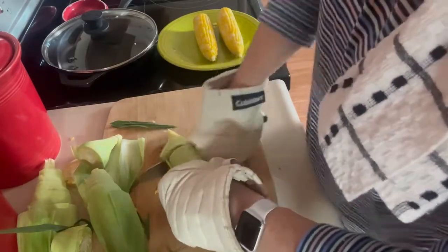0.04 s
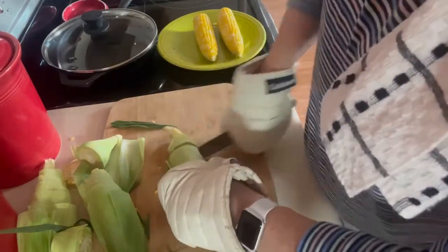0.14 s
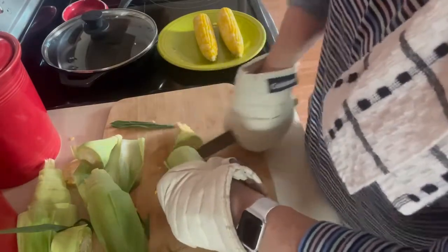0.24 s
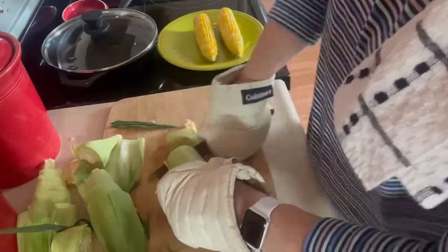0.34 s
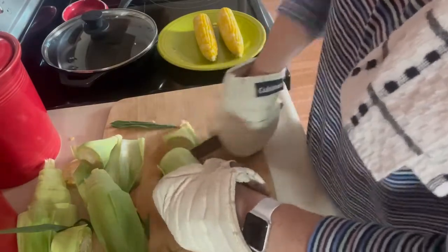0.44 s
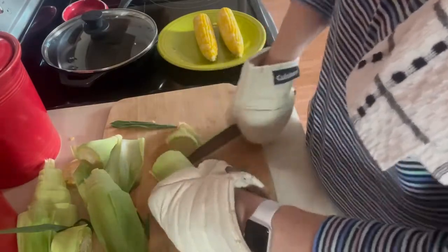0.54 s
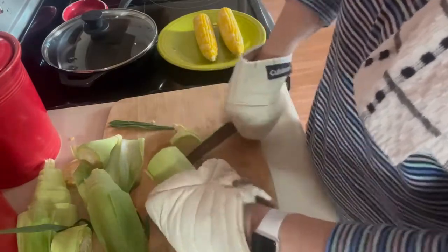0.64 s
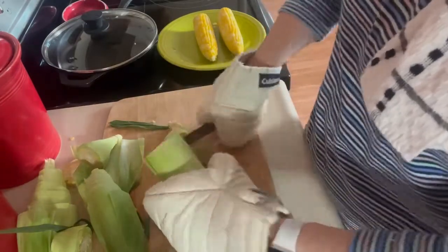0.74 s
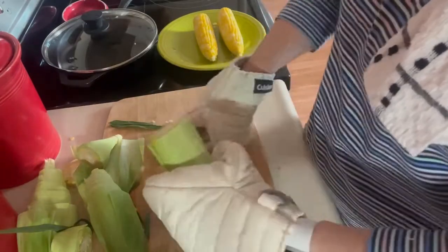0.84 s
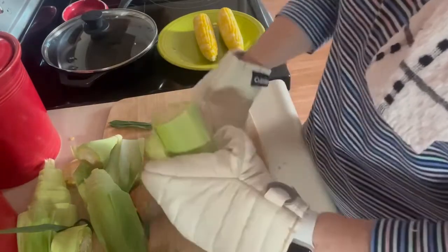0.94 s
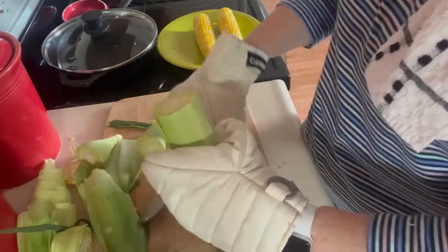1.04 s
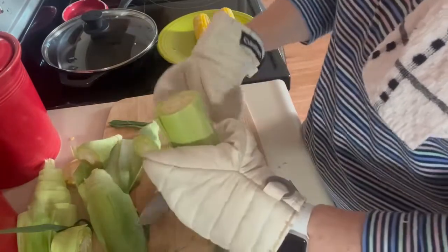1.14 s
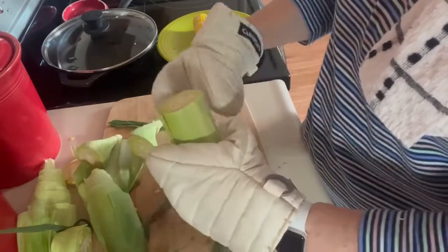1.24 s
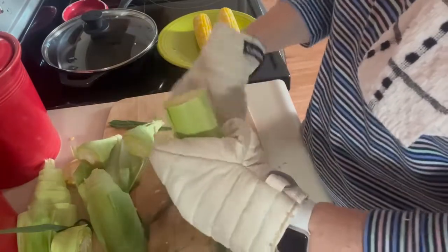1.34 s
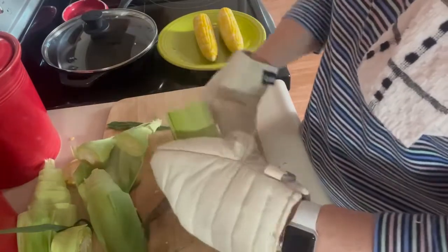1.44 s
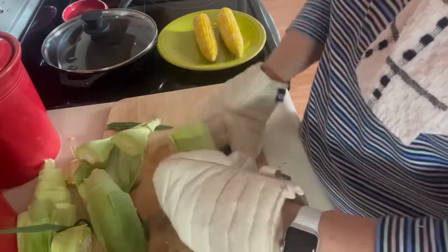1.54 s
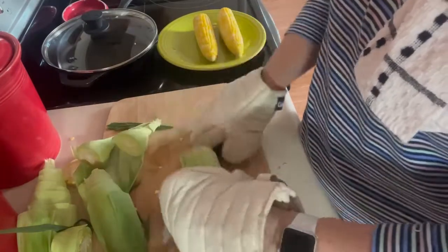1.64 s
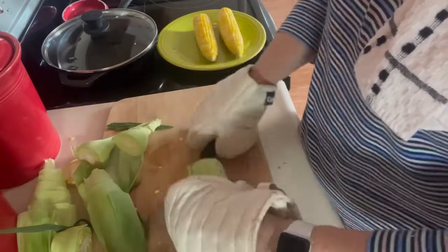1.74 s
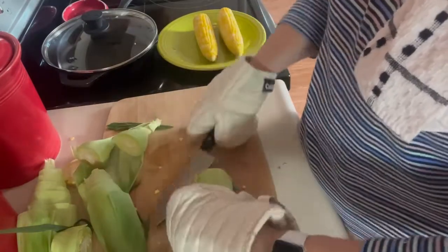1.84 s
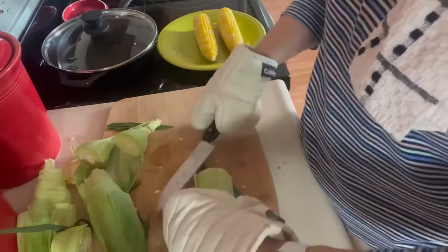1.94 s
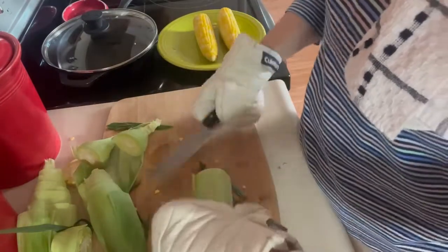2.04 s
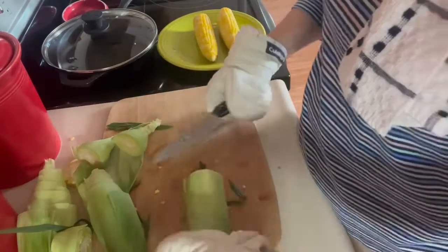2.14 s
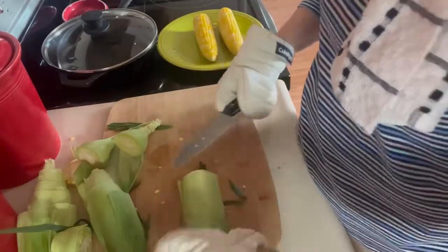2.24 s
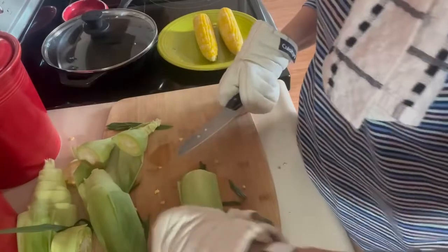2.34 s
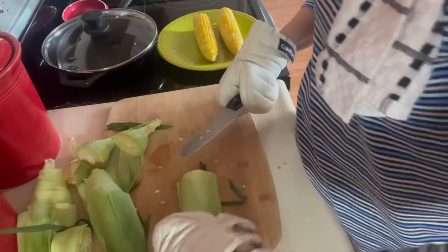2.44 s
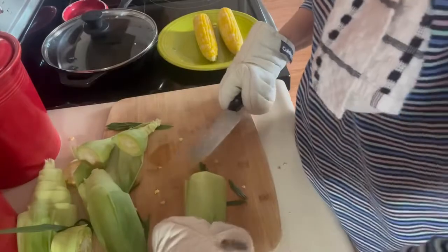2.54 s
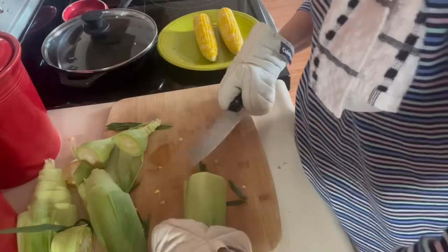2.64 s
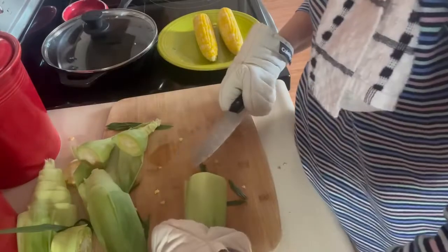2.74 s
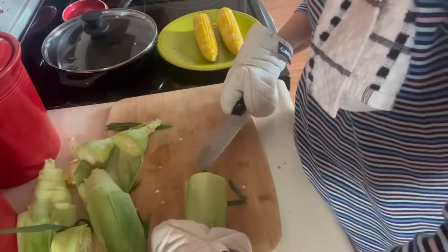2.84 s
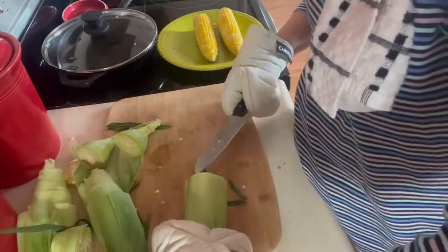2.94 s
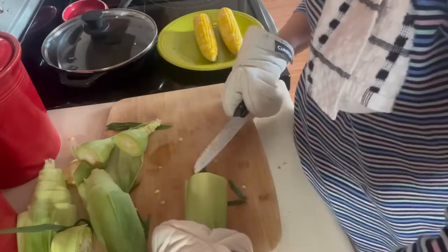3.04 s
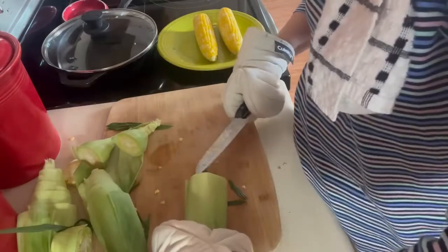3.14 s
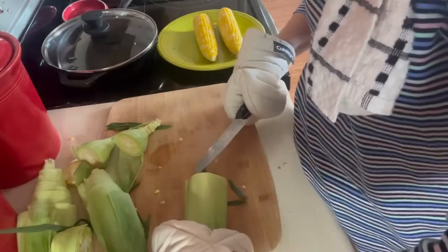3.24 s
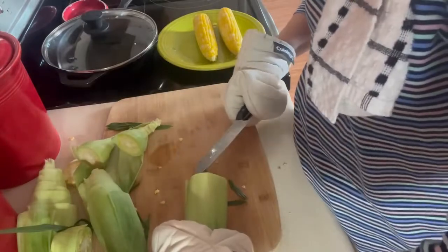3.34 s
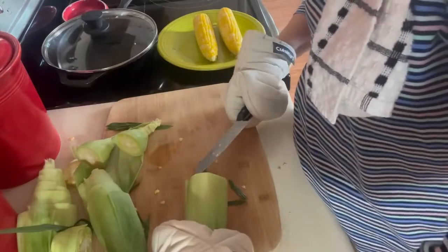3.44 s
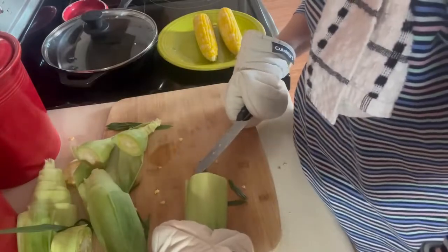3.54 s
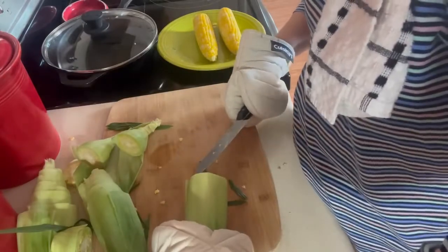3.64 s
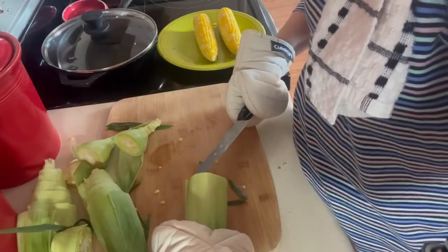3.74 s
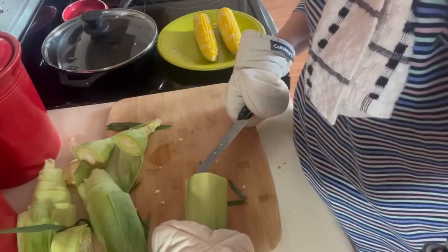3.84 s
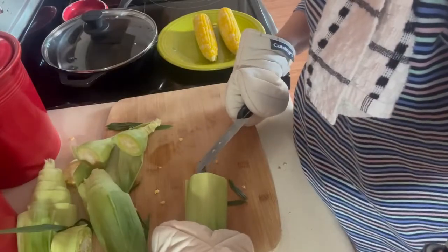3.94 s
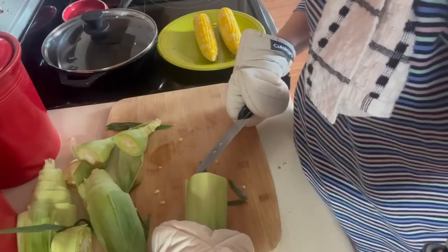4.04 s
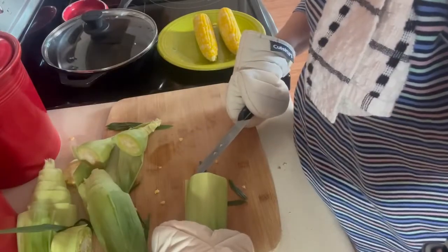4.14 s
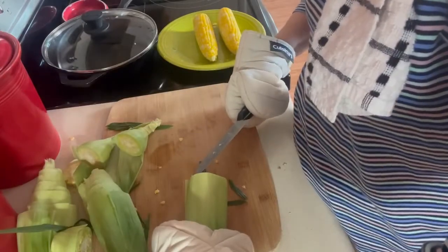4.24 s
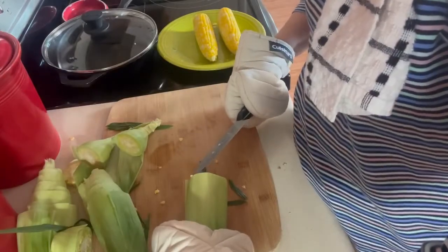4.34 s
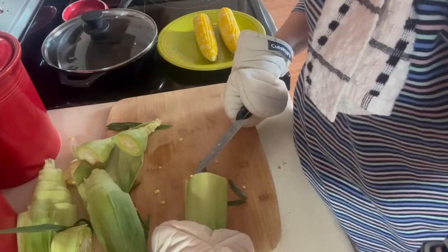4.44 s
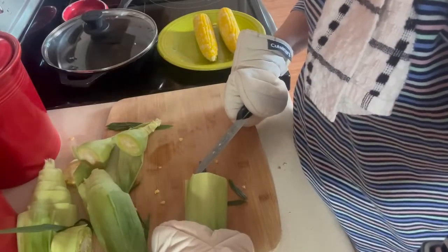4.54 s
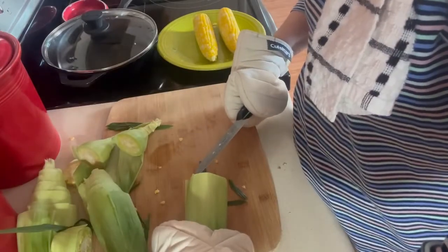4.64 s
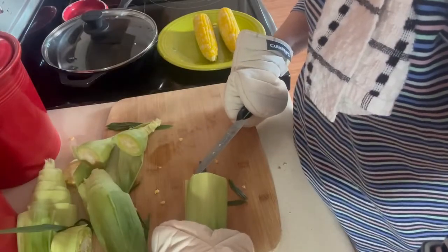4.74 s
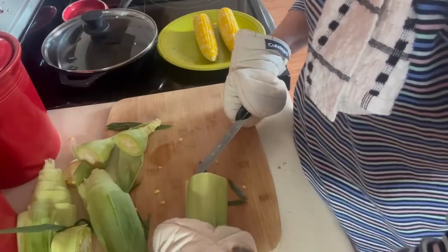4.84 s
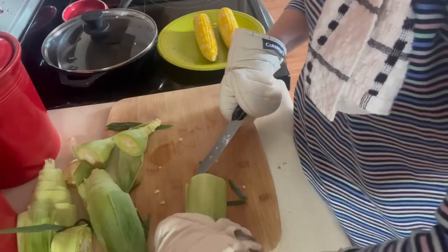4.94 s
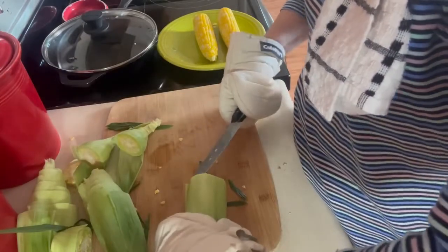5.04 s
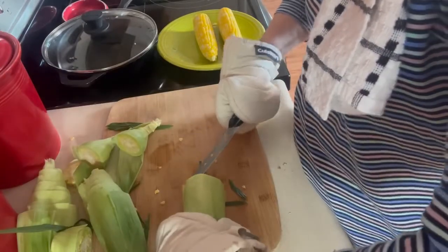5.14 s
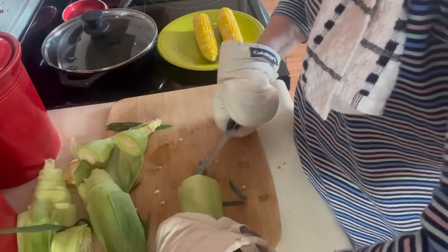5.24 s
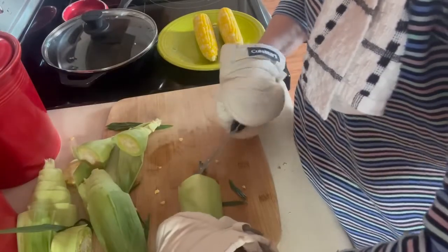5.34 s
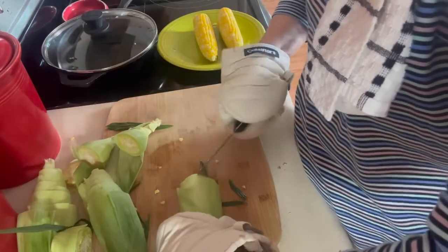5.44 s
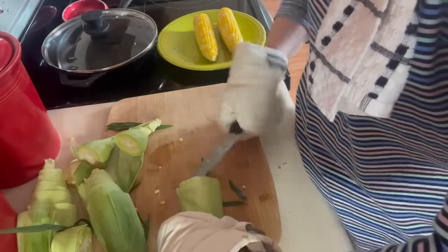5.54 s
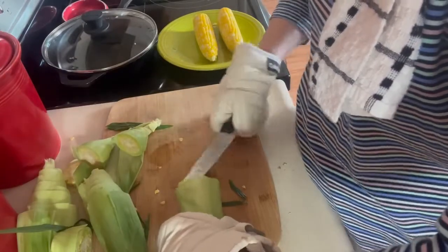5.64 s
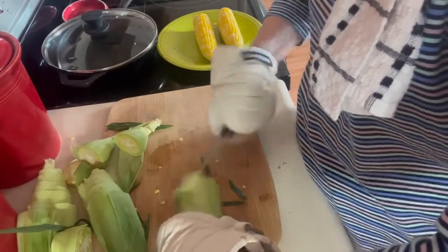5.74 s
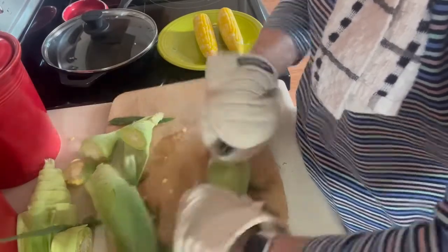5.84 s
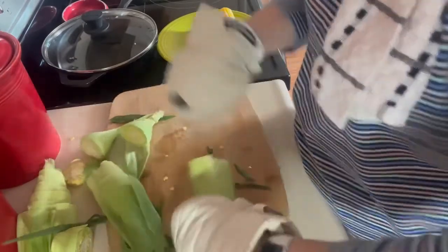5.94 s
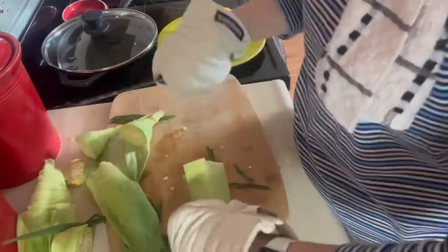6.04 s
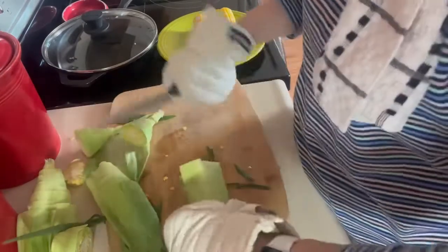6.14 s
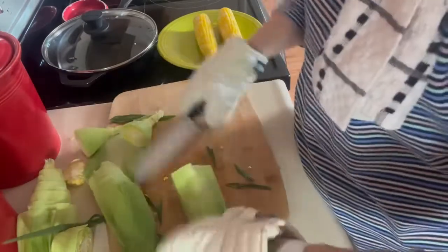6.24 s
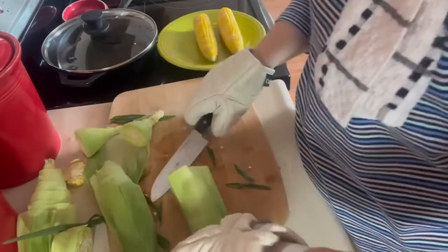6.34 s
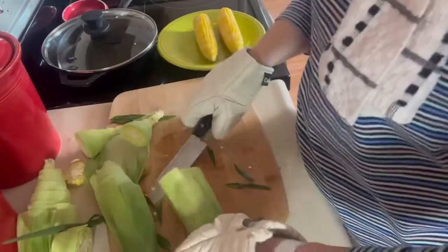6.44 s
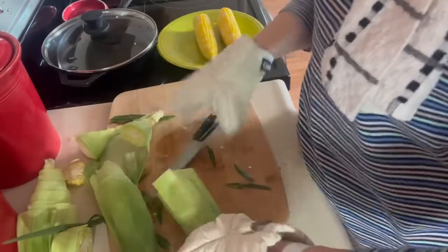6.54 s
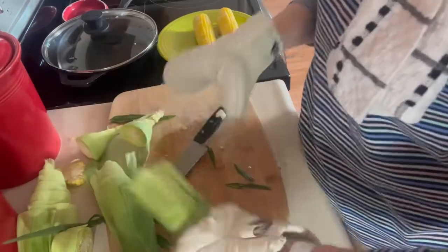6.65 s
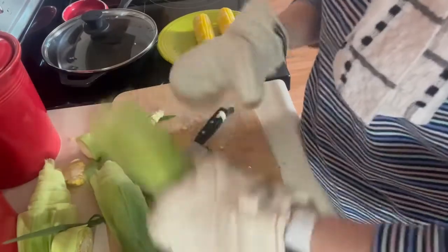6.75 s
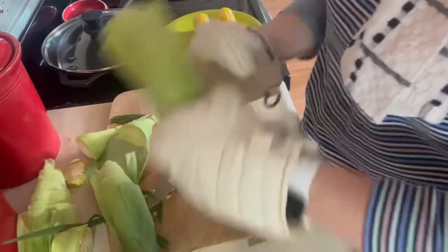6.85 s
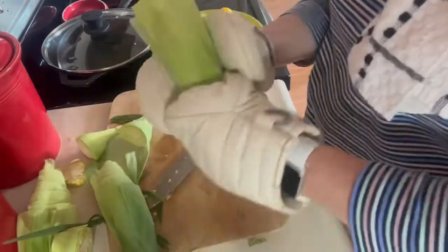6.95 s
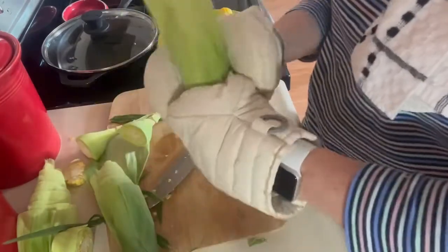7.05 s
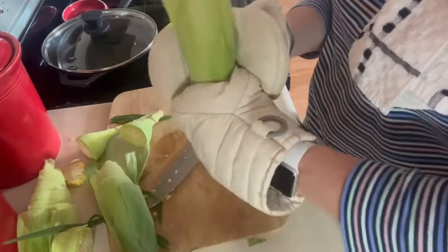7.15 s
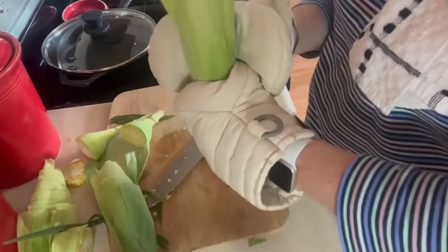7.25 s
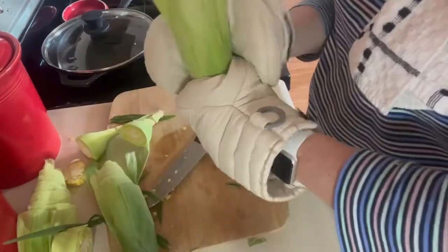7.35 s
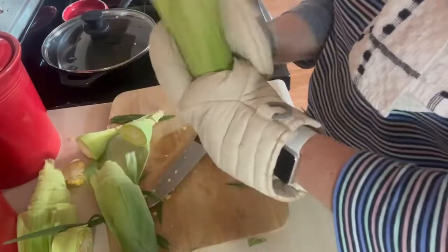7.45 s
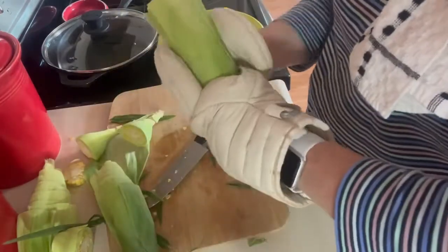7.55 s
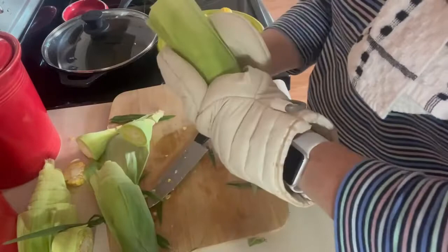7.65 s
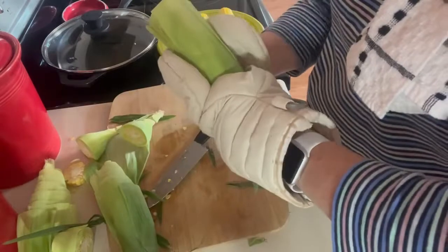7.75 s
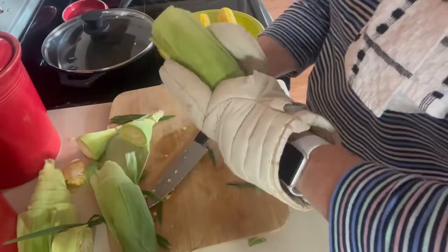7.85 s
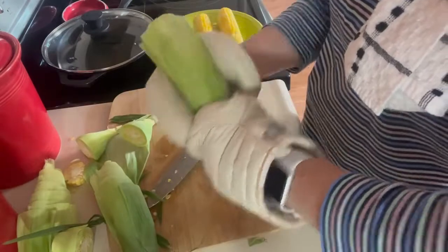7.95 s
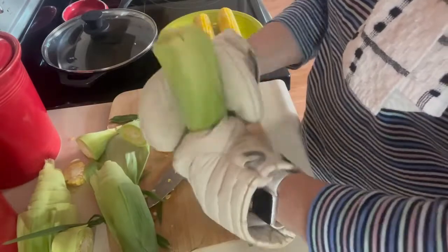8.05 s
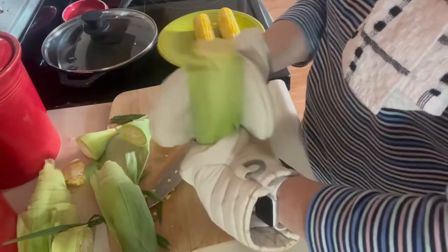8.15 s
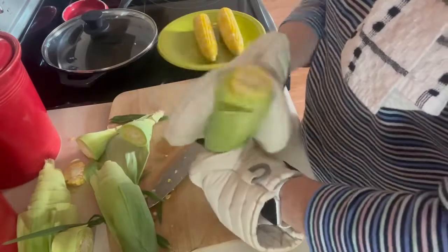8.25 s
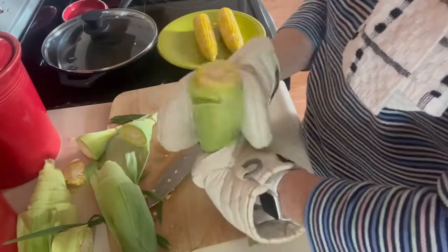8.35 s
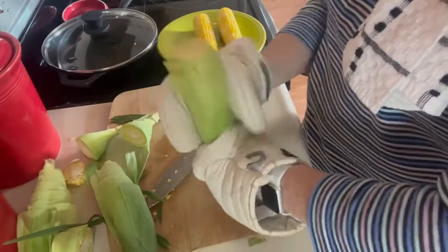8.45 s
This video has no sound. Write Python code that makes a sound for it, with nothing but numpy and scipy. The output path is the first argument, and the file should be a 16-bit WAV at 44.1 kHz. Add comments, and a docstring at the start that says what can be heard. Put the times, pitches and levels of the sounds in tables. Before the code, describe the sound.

Stereo close pickup, lightly echoing domestic room. Quiet sawing strokes come first, then a dense double knock of knife and cob on wood and a few smaller bumps. Near silence holds in the middle, with only hum and faint handling. Small ticks and drags return, then two sharp woody clacks with metallic clinks, a tumbling rattle, and soft dry rustling to the end.

```python
"""Knocks on a wooden board lead, as a gloved cook saws the end off a cooked corn cob in a small kitchen.
Knocks and drags ring board modes; the struck or sawing blade rings steel modes; thumps are damped sines.
Husk and mitts rustle as coloured grains, and rubbing feeds grains into the board modes.
Below lie filtered room noise and an appliance hum; dying noise makes the room's echoes."""
import sys
import numpy as np
from scipy import signal
from scipy.fft import rfft, irfft, next_fast_len
from scipy.io import wavfile

SR = 44100
rng = np.random.default_rng(int(sys.argv[2]) if len(sys.argv) > 2 else 0)


def unload_wav(signal):
    """Save mono or channel-first audio to the path in sys.argv[1] as 16-bit WAV at rate SR, clipped to [-1, 1]."""
    wavfile.write(
        sys.argv[1],
        SR,
        np.round(np.clip(np.atleast_2d(signal).T, -1, 1) * 32767).astype(np.int16),
    )


N = 374409


def from_db(db):
    """Amplitude ratio of a level in dB."""
    return 10 ** (np.asarray(db) / 20)


def rms_one(x):
    """x scaled to rms 1."""
    return x / np.sqrt(np.mean(x ** 2) + 1e-20)


def at_hz(points, hz):
    """Curve value, linear over log frequency."""
    points = np.array(points)
    return np.interp(np.log(hz), np.log(points[:, 0]), points[:, 1])


def drift(rate_hz):
    """Slow random curve of rms 1: noise through a two-pole lowpass, one point per 40 samples."""
    r = np.exp(-80 * np.pi * rate_hz / SR)
    slow = signal.lfilter([1], [1, -2 * r, r * r], rng.standard_normal(N // 40 + 2002))[2000:]
    return np.interp(np.arange(N) / 40, np.arange(len(slow)), rms_one(slow))


def ring(x, hz, t60_s):
    """Damped resonator: a unit click starts a decaying sine of height 1."""
    r = from_db(-60 / (t60_s * SR))
    w = 2 * np.pi * hz / SR
    return signal.lfilter([0, np.sin(w)], [1, -2 * r * np.cos(w), r * r], x + 1e-18)


def bands(x):
    """Half-octave bands of x[0] and x[1] in turn, with their centres in Hz."""
    edges_hz = 24 * 2 ** np.arange(0, 9.6, .5)
    for k, (low, high) in enumerate(zip(edges_hz, edges_hz[1:])):
        bandpass = signal.butter(2, [low, high], "band", fs=SR, output="sos")
        yield np.sqrt(low * high), signal.sosfilt(bandpass, x[k % 2])


def coloured(x, spectrum):
    """x through a spectrum in dB per Hz; rms 1."""
    size = next_fast_len(N)
    hz = np.maximum(np.fft.rfftfreq(size, 1 / SR), 1)
    shaped = rfft(x, size) * from_db(at_hz(spectrum, hz))
    return rms_one(irfft(shaped, size)[..., :N])


def stereo(mid, side, alike):
    """Left and right from a shared and an opposed part."""
    alike = np.clip(alike, -1, 1)
    return np.sqrt((1 + alike) / 2) * mid + np.sqrt((1 - alike) / 2) * side * [[1], [-1]]


def grains(per_s, spread_db):
    """Random clicks of uneven size, rms 1: one train for the shared, one for the opposed part."""
    sizes = from_db(spread_db * np.minimum(rng.exponential(1, N), 5))
    present = rng.random(N) < per_s / SR
    return rms_one(sizes * present * rng.standard_normal((2, N)))


def contacts(ms, gains, hz=None, length_s=.025):
    """Short dying force per event, (events, channels, samples), from gains (channels, events).
    With hz: the part that drives that mode, else broadband chatter."""
    t = np.arange(round(.02 * SR))
    shape = np.exp(-t / (np.c_[ms] * SR / 1000))
    shape = (shape * np.clip(t / (.0005 * SR), 0, 1))[:, None]  # contact closes in 0.5 ms
    force = rng.standard_normal((len(ms), 2, len(t)))
    force[:, 1] = .9 * force[:, 0] + .8 * force[:, 1]  # right side: a partly different mix
    if hz:
        phase = rng.uniform(0, 2 * np.pi, (len(ms), 1, 1))
        # sides part as pitch rises
        phase = phase + min(hz / 1600, 1.6) * rng.normal(0, 0.7, (len(ms), 2, 1))
        tone = 2 * np.cos(2 * np.pi * hz * t / SR + phase)
        force = shape * (tone + 4.0 * force) / shape.sum(axis=2, keepdims=True)
    else:
        force = shape * force / np.sqrt(np.sum(shape ** 2, axis=2, keepdims=True))
    padding = [(0, 0), (0, 0), (0, round(length_s * SR) - len(t))]
    return np.pad(force * np.transpose(gains)[..., None], padding)


def placed(seconds, sounds):
    """Each short sound laid down at its moment."""
    out = np.zeros((2, N))
    for s, sound in zip(seconds, sounds):
        start = int(s * SR)
        out[:, start:start + sound.shape[1]] += sound
    return out


def swells(s, rise_s, fall_s, peak_db, order=1):
    """Gain of swells that rise and fade in dB, pointed (order 1) or rounded (order 2); powers add."""
    t = np.arange(0, N + 40, 40) / SR
    late_s = t - np.c_[s]
    drop = np.where(late_s < 0, -late_s / np.c_[rise_s], late_s / np.c_[fall_s]) ** order
    db = np.c_[peak_db] - 20 * drop
    return np.interp(np.arange(N) / SR, t, np.sqrt(np.sum(from_db(2 * db), axis=0)))


# knocks on the board: (time [s], level [dB], low body [rel dB], upper modes [rel dB], crack [rel dB],
#   best-excited pitch [Hz])
KNOCKS = [(0.078, -33, -8, -6, -14, 1200), (0.105, -32, -8, -2, -8, 2280), (0.11, -34, -8, -6, -14, 1300),
          (0.146, -23, -18, -16, -12, 1350), (0.592, -43, -3.5, -8.5, -9.5, 1280),
          (0.646, -49, -6, -15.5, -5.5, 1830), (0.875, 0, -13, -6, -24.5, 1560),
          (0.879, -12, -11, -10.5, -16, 1160), (0.915, -1, -18, -10, -20, 1070),
          (0.92, -11, -14, -15, -18, 1160), (0.954, -10.5, -9.5, -20.5, -26, 1200),
          (0.965, -20.5, -1, -13, -23.5, 736), (1.049, -18, -2.5, -22, -36, 1120),
          (1.118, -23.5, -18, -17, -32.5, 1080), (1.318, -15, -11, -7, -34, 1500),
          (1.593, -37, 2, -26, -24, 900), (1.613, -30, -3, -22, -26, 1240),
          (1.659, -26, -10, -30, -22.5, 1202), (4.795, -45, -4.5, -17, -18, 1335),
          (5.701, -39, -0.5, -11, -7, 1120), (5.727, -23, -9, -21, -21.5, 724),
          (6.278, -10, -13, -9, -12, 1500), (6.282, -10, -16, -12, -14, 1150),
          (6.328, -19, -18, -6, -14, 1150), (6.334, -12, -16, -14, -19, 1130),
          (6.349, -20, -10, -12, -22, 1190), (6.508, -14, -21, -2, -20, 1600),
          (6.512, 0, -23, -7, -16, 830), (6.525, -17, -14, -14, -19, 816), (6.537, -19, -18, -8, -14, 781),
          (6.567, -9, -18, -15, -31.5, 1450), (6.583, -14.5, -16.5, -10, -19, 1490),
          (6.608, -27, -8, -21, -7, 824), (6.634, -14.5, -12, -27, -29, 730),
          (6.646, -10, -20, -12, -28, 1680), (6.649, -7.5, -18, -14.5, -28.5, 797),
          (6.809, -38, -4.5, -19, -36, 772), (6.846, -42, -4, -17, -34, 724),
          (6.884, -44, 3, -13, -7.5, 982), (6.927, -36, 0, -21, -32, 740),
          (6.963, -41.5, -15, -25, -35, 745), (8.233, -50.5, -6, -18, -2.5, 641)]
# knife tip slips in the cob, ticks on the board: (time [s], level [dB])
TICKS = [(5.016, -52), (5.055, -37), (5.183, -31), (5.23, -29), (5.345, -48), (5.404, -43), (5.477, -33),
         (5.497, -36), (5.513, -37), (5.528, -35), (5.544, -36), (5.599, -33)]
# colour of every tick: (low body [rel dB], upper modes [rel dB], crack [rel dB], best-excited pitch [Hz])
TICK_COLOUR = (-20, -21, -14, 620)
# low and upper board modes: (frequency [Hz], level [dB], free t60 [s])
BOARD_LOW = [(241, -4, 0.066), (268, 0.5, 0.062), (323, -5, .07), (380, -4.5, 0.063), (474.6, -1, 0.023),
             (532, -1.5, 0.02)]
BOARD = [(600, -3.5, 0.028), (741, 1, 0.026), (832, -2, .03), (952, -7, .03), (1090, -0.5, 0.025),
         (1190, -2, 0.025), (1265, 0, 0.025), (1450, 0, 0.02), (1680, 0.5, .02), (1888, -2, 0.018),
         (2100, 1, 0.02), (2260, -3.5, .022), (2450, -11, 0.016), (2650, -12, .015), (2900, -7, 0.015),
         (3200, -9, .015), (3650, -10, 0.017), (3990, -13, 0.017)]
# crack on top of a blow: (frequency [Hz], level [dB per Hz])
CRACK = [(1500, -30.5), (3000, -4), (5000, -1.5), (6500, -5), (8000, -14), (10500, -22), (12500, -36),
         (16500, -50)]
# dense board modes: (frequency [Hz], level [dB per Hz])
CLACK = [(300, -30), (600, -1.5), (1200, -0.5), (2100, -3), (2600, -10), (3400, -7), (5000, -26),
         (8000, -42), (12000, -65)]
CONTACT_MS, TICK_MS = 1.9, 1.3
BOARD_PAN_DB, CRACK_PAN_DB, PAN_SCATTER_DB = 2.4, -2.5, 1.5  # left over right
THUD_DELAY_S = .003  # heavy low modes answer late


def knocks():
    """Each blow rings the modes near its own pitch most, thuds in the low modes and cracks on top."""
    events = KNOCKS + [tick + TICK_COLOUR for tick in TICKS]
    s, peak_db, low_db, high_db, crack_db, pitch_hz = np.transpose(events)
    ms = np.repeat([CONTACT_MS, TICK_MS], [len(KNOCKS), len(TICKS)])
    pan_db = rng.normal(BOARD_PAN_DB, PAN_SCATTER_DB, len(s))
    level = from_db(peak_db + np.outer([.5, -.5], pan_db))
    knock, thud = 0, 0
    for hz, db, t60_s in BOARD:
        octaves = np.log2(hz / pitch_hz)
        share_db = high_db + 5 if hz > 1800 else np.where(octaves < 0, 19 * octaves, -7 * octaves)
        share_db = share_db + rng.normal(0, 2.5, len(s))
        # blows with little crack ring the top modes less
        share_db = share_db + (hz > 2600) * np.minimum(.5 * crack_db + 7, 0)
        force = contacts(ms, level * from_db(db + share_db - 6), hz, .05)
        knock = knock + ring(force, hz, t60_s)
    for hz, db, t60_s in BOARD_LOW:
        force = contacts(ms, level * from_db(db + low_db - 3.5), hz, .09)
        thud = thud + ring(force, hz, t60_s)
    crack_pan_db = np.c_[[.5 * CRACK_PAN_DB, -.5 * CRACK_PAN_DB]]
    crack = placed(s, contacts(1.6 * ms, from_db(peak_db + crack_db + 20 + crack_pan_db)))
    clack = placed(s, contacts(1.8 * ms, level * from_db(0.3)))
    # wood against wood is soft on top
    knock = signal.sosfilt(signal.butter(2, 4800, fs=SR, output="sos"), knock)
    modes = placed(s, knock) + placed(s + THUD_DELAY_S, thud)
    return modes + coloured(crack, CRACK) * np.std(crack) + coloured(clack, CLACK) * np.std(clack)


# knife or cob drags and chatters on the board: (peak time [s], 20 dB rise [s], 20 dB fall [s],
#   level [dB], best-excited pitch [Hz], upper modes [rel dB])
DRAGS = [(0.105, .04, .04, -42, 330, -12), (0.873, .016, .003, -21, 1750, -6),
         (0.893, .012, .035, -21, 600, -8), (0.934, .012, .04, -21, 1000, -8),
         (0.972, .012, .04, -25, 420, -18), (1.0, .02, .06, -30, 600, -14),
         (1.064, .012, .04, -36, 500, -20), (1.316, .014, .003, -37, 1700, -6),
         (1.336, .01, .06, -34, 1100, -17), (1.6, .05, .03, -34.5, 330, -25),
         (1.605, .05, .04, -39, 1200, -18), (1.63, .03, .05, -34.5, 330, -25),
         (5.732, .01, .03, -33, 450, -18), (5.748, .012, .04, -36, 300, -18),
         (5.792, .03, .012, -34, 1300, -14), (5.8, .012, .035, -33, 700, -18),
         (5.82, .03, .04, -36, 280, -22), (5.846, .015, .04, -39, 300, -22),
         (6.288, .012, .04, -24, 260, -30), (6.303, .012, .04, -25, 280, -30),
         (6.292, .006, .04, -27, 1500, -6), (6.356, .014, .05, -27, 1180, -7),
         (6.508, .025, .003, -25, 1500, -3), (6.53, .012, .04, -21, 950, -7),
         (6.549, .02, .022, -22, 820, -8), (6.592, .015, .04, -27, 820, -9),
         (6.665, .012, .05, -30, 760, -12), (6.78, .05, .08, -45, 1700, -8),
         (6.93, .02, .05, -46, 1250, -20)]
CHATTER_PER_S, DRAG_DETUNE_RATIO, DRAG_SCATTER_DB = 3000, .03, 2.5


def drags():
    """Dense uneven contacts under a swell; each drag shifts and weights the board modes its own way."""
    late_s = np.arange(round(-.05 * SR), round(.13 * SR)) / SR
    sounds = []
    for s, rise_s, fall_s, level_db, pitch_hz, high_db in DRAGS:
        swell = from_db(level_db - 20 * np.where(late_s < 0, -late_s / rise_s, late_s / fall_s))
        sound, power = 0, 0
        for hz, db, t60_s in BOARD_LOW + BOARD:
            present = rng.random(len(late_s)) < CHATTER_PER_S / SR
            hits = present * rng.standard_normal((2, len(late_s)))
            share_db = high_db if hz > 1800 else -17 * abs(np.log2(hz / pitch_hz))
            gain = from_db(db + share_db + DRAG_SCATTER_DB * rng.standard_normal())
            shifted_hz = hz * (1 + DRAG_DETUNE_RATIO * rng.standard_normal())
            damped_s = .7 * t60_s
            sound = sound + gain * ring(hits * swell, shifted_hz, damped_s) / np.sqrt(damped_s)
            power += gain ** 2
        sounds.append(stereo(*sound, .7) / np.sqrt(power * CHATTER_PER_S / np.log(1000) / 2))
    pan = from_db([[.5 * BOARD_PAN_DB], [-.5 * BOARD_PAN_DB]])
    return placed(np.array(DRAGS)[:, 0] + late_s[0], sounds) * pan


# saw strokes through the cob: (full-pressure time [s], 20 dB rise [s], 20 dB fall [s],
#   blade [dB], husk [dB], rubbing on the board [dB])
STROKES = [(0.1, .1, .075, -36, -40, -41), (0.27, .11, .075, -43, -47, -48),
           (0.45, .11, .075, -39, -45, -46)]


def strokes():
    """Gains of blade, husk and rubbing as rounded pressure swells, one per saw stroke."""
    s, rise_s, fall_s, *levels_db = np.transpose(STROKES)
    return [swells(s, rise_s, fall_s, db, order=2) for db in levels_db]


# blade strikes: (time [s], level [dB], modes under 8 kHz [rel dB], edge tick [rel dB], ring time factor)
PINGS = [(0.146, -52, 5, 30, .3), (0.916, -36, 5, 43, .5), (3.661, -40, -30, -15, 1.4),
         (6.278, -23, 30, 24, .6), (6.283, -30, 32, 24, .6), (6.328, -37, 32, 26, .5),
         (6.333, -35, 34, 27, .65), (6.349, -42, 32, 20, .65), (6.512, -42, 5, 27, .3),
         (6.608, -33, -2, 25, 2.4)]
# blade modes: (frequency [Hz], struck level [dB], free t60 [s], sawing level [dB])
BLADE = [(1150, 3, .035, -3), (1290, -11, .04, -1), (1590, -1, .03, -7), (1780, -4, .025, -5),
         (2080, -3, .025, 0.5), (2270, -9, .025, -1.5), (2860, -14, .03, -6), (3050, -6, .075, -5),
         (3330, -11, .04, -8), (3980, -16, .03, -6), (4900, -2, .022, -7), (5150, -7, .02, -7),
         (6050, -7, .02, -11), (6350, -8, .025, -8), (7690, -16, .045, -16), (9345, -3, .09, -25),
         (11090, -12, .09, -25), (13000, -3, .09, -25), (13380, -6, .05, -25), (15040, 0, .09, -25)]
# tick of the edge: (frequency [Hz], level [dB per Hz])
EDGE = [(2500, -36), (4500, -6), (6300, -4), (9800, -2), (12000, -9), (13800, -5), (15300, 6), (16500, -8)]
BLADE_DETUNE_RATIO, EDGE_MS = .008, 3.0
SAW_DAMPING, SAW_WAVER_DB = .3, 5.5  # the cob shortens t60


def blade():
    """Steel modes, struck unevenly with an edge tick on top; sawing feeds them grains, damped by the cob."""
    s, peak_db, low_db, tick_db, ring_factor = np.transpose(PINGS)
    pings, rasp = 0, 0
    span = SR  # sawing lies in the first second
    teeth = grains(2000, spread_db=2.0)[:, :span]
    for k, (hz, db, t60_s, saw_db) in enumerate(BLADE):
        strength_db = peak_db + db - 15 + low_db * (hz < 8000) + rng.normal(0, 2.5, (2, len(s)))
        shifted_hz = hz * (1 + BLADE_DETUNE_RATIO * (hz < 8000) * rng.standard_normal(len(s)))
        forces = contacts(np.full(len(s), 3.5), from_db(strength_db), hz, .2)
        rung = [ring(force, at, t60_s * max(factor, .1))
                for force, at, factor in zip(forces, shifted_hz, ring_factor)]
        pings = pings + np.array(rung)
        damped_s = SAW_DAMPING * min(t60_s, .04)
        saw_gain = from_db(saw_db + SAW_WAVER_DB * drift(9)[:span]) / np.sqrt(damped_s)
        rasp = rasp + (-1) ** k * ring(teeth, hz, damped_s) * saw_gain
    ticks = placed(s, contacts(np.full(len(s), EDGE_MS), from_db([peak_db + tick_db] * 2)))
    out = placed(s, pings) + coloured(ticks, EDGE) * np.std(ticks)
    out[:, :span] += stereo(*rms_one(rasp), .3) * strokes()[0][:span]
    return out


# dull thumps through the counter: (time [s], level [dB], pitch [Hz])
THUMPS = [(0.009, -30, 56.5), (0.098, -28.5, 145), (0.199, -33, 60), (0.885, -16.5, 133),
          (0.93, -17.5, 151), (0.964, -20.5, 151), (1.019, -29, 65), (1.058, -31, 148), (1.138, -30, 169),
          (1.199, -29, 375), (1.232, -32.5, 358), (1.299, -26, 348), (1.329, -29.5, 171), (1.444, -33, 410),
          (1.659, -33.5, 60), (1.822, -30, 132.3), (1.843, -29, 59.2), (2.389, -35, 54.3),
          (2.65, -39, 57.4), (5.731, -30, 135), (5.779, -30, 59), (5.809, -31, 65.4), (5.845, -34, 82),
          (6.28, -26, 61.9), (6.282, -20, 265), (6.297, -23, 285), (6.529, -28, 163), (6.557, -21, 164)]


def thumps():
    """A soft push, two or three cycles of a damped sine, the same on both sides."""
    out = np.zeros(N)
    for s, level_db, hz in THUMPS:
        cycles = np.arange(int(5 * SR / hz)) * hz / SR
        push = cycles * np.exp(1 - 2.2 * cycles) * np.sin(2 * np.pi * cycles)
        start = int(s * SR)
        out[start:start + len(push)] += from_db(level_db + 4.5) * push
    return out


# hand movements: (peak time [s], 20 dB rise [s], 20 dB fall [s], husk [dB], rubbing on the board [dB])
MOVES = [(0.147, .015, .015, -38, -46), (0.6, .07, .2, -54, -59), (0.72, .2, .5, -54, -60),
         (1.0, .1, .12, -50, -44), (1.1, .1, .15, -62, -46), (1.35, .03, .25, -72, -50),
         (1.4, .08, .2, -56, -70), (1.472, .05, .05, -57, -62), (1.612, .07, .06, -54, -45),
         (1.66, .02, .15, -52.5, -48), (1.95, .3, .3, -61, -63), (2.08, .06, .12, -60, -64),
         (2.225, .12, .12, -59, -57), (2.466, .4, .2, -64, -60), (2.74, .1, .2, -70, -70),
         (2.882, .15, .18, -69, -68), (3.054, .15, .12, -68, -76), (3.87, .03, .03, -90, -72),
         (4.056, .05, .03, -79, -76), (4.885, .14, .1, -61.5, -65), (5.07, .1, .5, -62, -69),
         (5.175, .2, .2, -60, -63), (5.42, .2, .1, -61, -61), (5.5, .05, .2, -54, -68),
         (5.585, .15, .05, -55, -60), (5.728, .04, .2, -46, -49), (5.795, .15, .15, -43, -48),
         (5.91, .3, .07, -54, -57), (6.2, .17, .3, -56, -59), (6.46, .1, .1, -52, -48),
         (6.72, .1, .4, -60, -49), (6.89, .04, .04, -50, -54), (6.97, .15, .5, -64, -62),
         (7.2, .4, .15, -68, -66), (7.426, .14, .2, -55, -59), (7.74, .15, .2, -69, -72),
         (7.936, .05, .05, -58, -65), (8.05, .3, .3, -67, -64), (8.17, .2, .2, -59, -58),
         (8.238, .1, .06, -60, -64), (8.48, .1, .1, -66, -61)]
# rustle: (frequency [Hz], level [dB per Hz])
RUSTLE = [(400, -30.5), (1000, -15), (2200, -11), (5000, -12), (9000, -13), (12500, -16), (15600, -7),
          (16200, -34.5)]
REST_HUSK_DB, REST_RUB_DB, REST_WEIGHT_DB = -103, -84, -63  # hands at rest
RUB_TILT_DB_PER_OCTAVE = -1.8  # rubbing drives the upper modes less
WEIGHT_OVER_RUB_DB, WEIGHT_WAVER_DB = -5, 2.5  # pressure on the counter follows rubbing, unevenly


def hands():
    """Husk crackles in clumps; rubbing and weight feed dense grains into the board modes."""
    s, rise_s, fall_s, husk_db, rub_db = np.transpose(MOVES)
    _, stroke_husk, stroke_rub = strokes()
    rustling = swells(s, rise_s, fall_s, husk_db) + stroke_husk + from_db(REST_HUSK_DB)
    rubbing = swells(s, rise_s, fall_s, rub_db) + stroke_rub + from_db(REST_RUB_DB)
    weight = from_db(WEIGHT_OVER_RUB_DB) * rubbing + from_db(REST_WEIGHT_DB)
    weight = weight * from_db(WEIGHT_WAVER_DB * drift(11))
    husk = grains(5000 * from_db(8 * drift(25)), spread_db=-2.0) + 0.7 * rng.standard_normal((2, N))
    husk = stereo(*coloured(husk, RUSTLE), .1) * rustling * from_db(1.2 * drift(4.7))
    rub_grains, press_grains = grains(2500, spread_db=-3.0), grains(900, spread_db=2.0)
    rub, press = 0, 0
    for k, (hz, db, t60_s) in enumerate(BOARD):
        mode_db = db + RUB_TILT_DB_PER_OCTAVE * np.log2(hz / 1000) + 2.2 * drift(4)
        rub = rub + (-1) ** k * from_db(mode_db) * ring(rub_grains, hz, 0.2 * t60_s)
    for hz, db, t60_s in BOARD_LOW:
        press = press + from_db(db) * ring(press_grains, hz, .7 * t60_s)
    rub = stereo(*rms_one(rub), .45) * rubbing * from_db(1.1 * drift(11))
    return husk + rub + stereo(*rms_one(press), .7) * weight


# echo decay: (frequency [Hz], t60 [s])
ROOM_T60 = [(150, 0.34), (1000, 0.39), (4000, 0.32), (12000, 0.21)]
ROOM_DB = -11.5


def kitchen(x):
    """Dense echoes: noise dying band by band, another on each side."""
    t = np.arange(SR) / SR
    echo = 0
    for hz, band in bands(rng.standard_normal((2, 2, SR))):
        echo = echo + band * from_db(-60 * t / at_hz(ROOM_T60, hz))
    echo = echo * np.clip(t / 0.004, 0, 1)
    return signal.fftconvolve(x, echo / np.sqrt(np.sum(echo ** 2) / 2), axes=1)[:, :N]


# room noise: (frequency [Hz], level [dB per Hz])
AIR = [(25, -24.5), (45, -7.5), (70, -4), (90, -15), (110, -8), (200, -9), (290, -20), (385, -18),
       (680, -31.5), (1300, -41), (2200, -59), (4500, -64.5), (9000, -71.5), (16500, -74)]
# hum resonances: (frequency [Hz], width [Hz], level [dB rms])
HUM = [(57, 2.7, -53.5), (119.65, 6.4, -63), (153.6, 10, -57), (216, 1.7, -66), (257.6, 2.6, -64),
       (382, 8, -71)]
# stereo spread: (frequency [Hz], left-right likeness [-1..1])
LIKENESS = [(60, 1), (180, 0.71), (550, -0.16), (1650, 0.08), (4970, -0.22), (15000, -0.54)]
AIR_DB_RMS, MOTOR_HZ, MOTOR_DB_RMS = -50.5, 196.2, -53.5


def air():
    """Room noise in wavering bands, hum as noise in narrow resonances, and a wandering motor tone."""
    out = 0
    for hz, (mid, side) in bands(rng.standard_normal((2, 2, N))):
        gain = from_db(at_hz(AIR, hz) + .8 * drift(5))
        out = out + gain * stereo(mid, side, at_hz(LIKENESS, hz))
    out = from_db(AIR_DB_RMS) * rms_one(out)
    for hz, width_hz, level_db in HUM:
        t60_s = np.log(1000) / np.pi / width_hz
        mid, side = ring(rng.standard_normal((2, N)), hz, t60_s)
        out = out + from_db(level_db) * rms_one(stereo(mid, side, at_hz(LIKENESS, hz) ** .3))
    turns = np.cumsum(MOTOR_HZ + 1.3 * drift(3)) / SR
    motor_gain = from_db(MOTOR_DB_RMS + 0.86 * drift(1.7))
    return out + motor_gain * np.sqrt(2) * np.sin(2 * np.pi * turns)


def scene():
    """Blows and blade with their echoes, over thumps, hands and air."""
    blows, steel = knocks() + drags(), blade()
    echoes = from_db(ROOM_DB) * kitchen(blows + .6 * steel)
    return blows + steel + echoes + thumps() + hands() + air()


CUTOFF_HZ = 17100


def record(dry):
    """Stereo pair, left slightly late; treble narrow from 8 to 12 kHz, wide above 13 kHz;
    peaks rounded, top cut."""
    dry = signal.sosfilt(signal.butter(3, 38, "high", fs=SR, output="sos"), dry)
    left, right = np.roll(dry[0], 3), dry[1]  # left 3 samples late
    mid, side = (left + right) / 2, (left - right) / 2
    below = signal.sosfilt(signal.cheby2(18, 40, 13600, fs=SR, output="sos"), mid)
    mid = below + from_db(-24.5) * mid
    notch = signal.cheby2(5, 30, [8400, 11900], "bandstop", fs=SR, output="sos")
    side = signal.sosfilt(notch, side)
    rounded = .97 * np.tanh(np.array([mid + side, mid - side]) / .97)
    return signal.sosfilt(signal.cheby2(20, 85, CUTOFF_HZ, fs=SR, output="sos"), rounded)


dry = scene()
out = record(dry)
unload_wav(out)
```